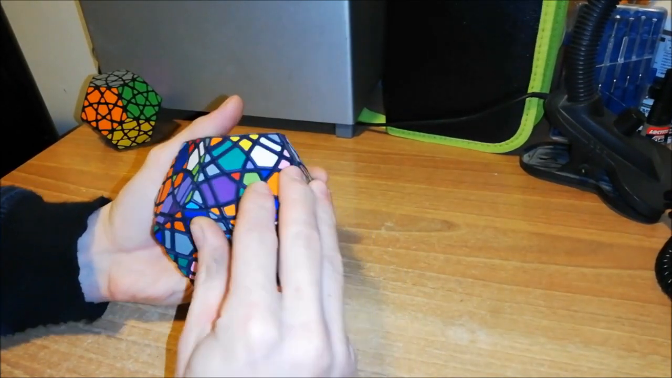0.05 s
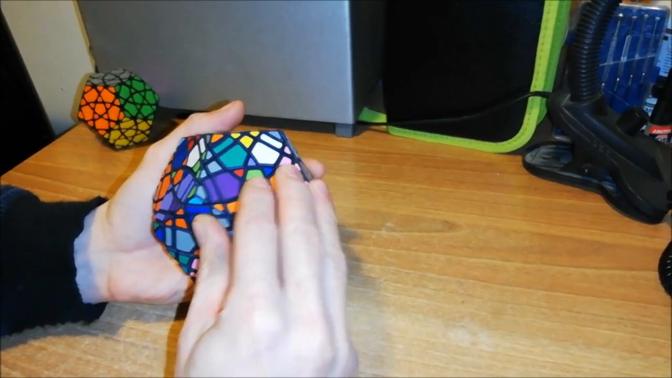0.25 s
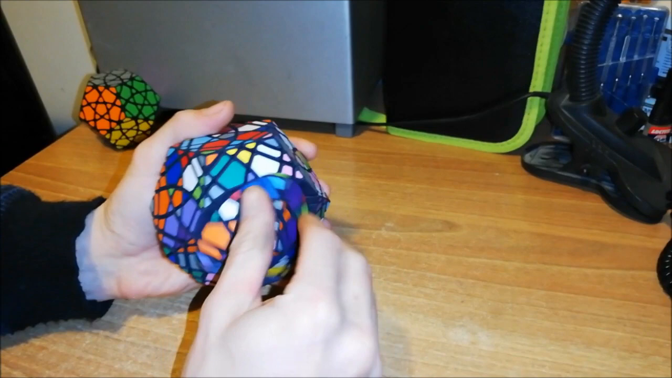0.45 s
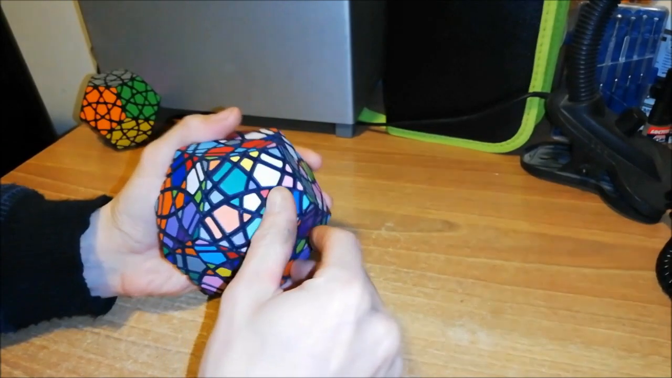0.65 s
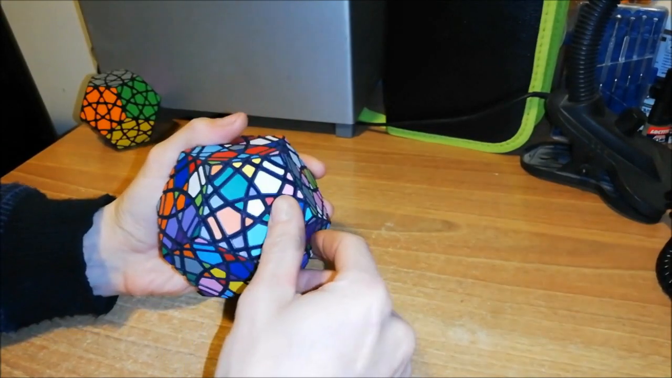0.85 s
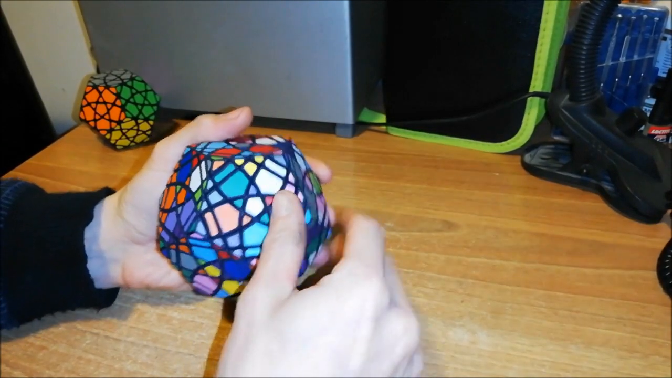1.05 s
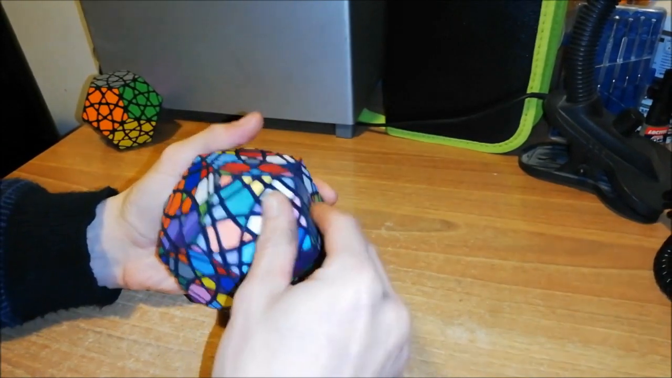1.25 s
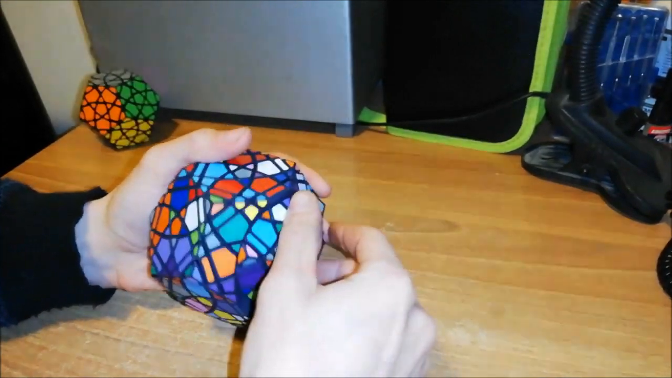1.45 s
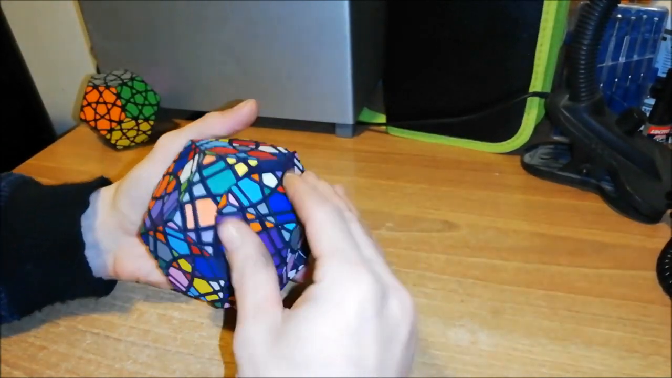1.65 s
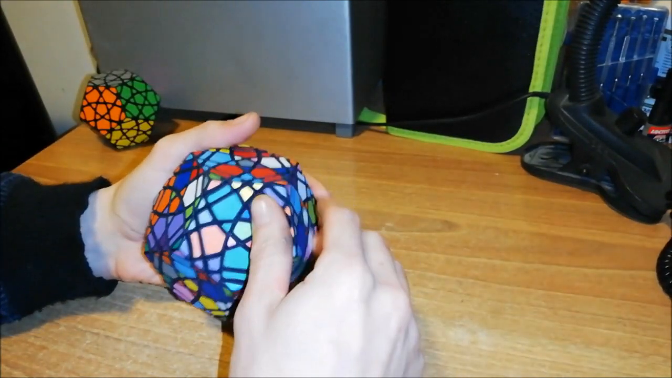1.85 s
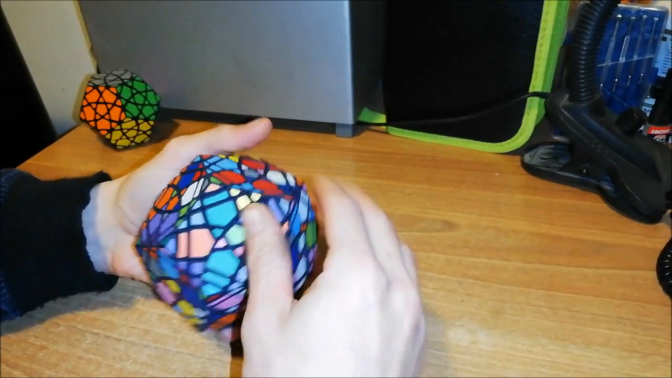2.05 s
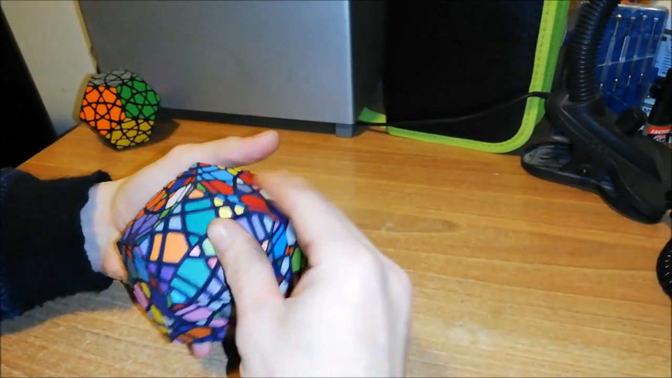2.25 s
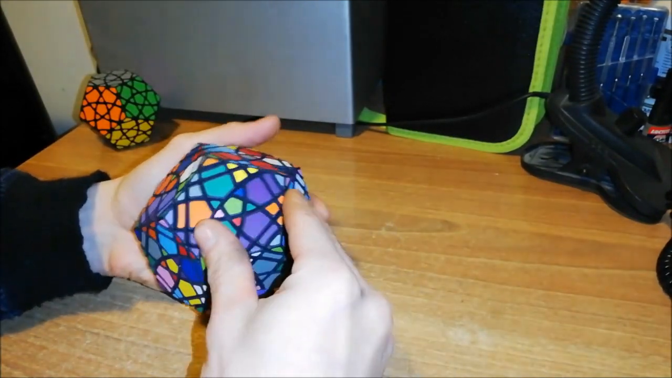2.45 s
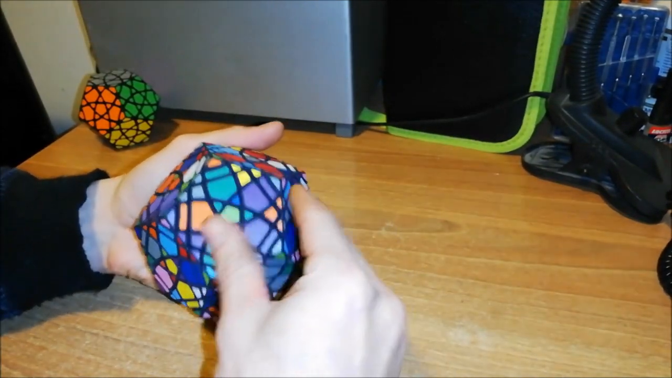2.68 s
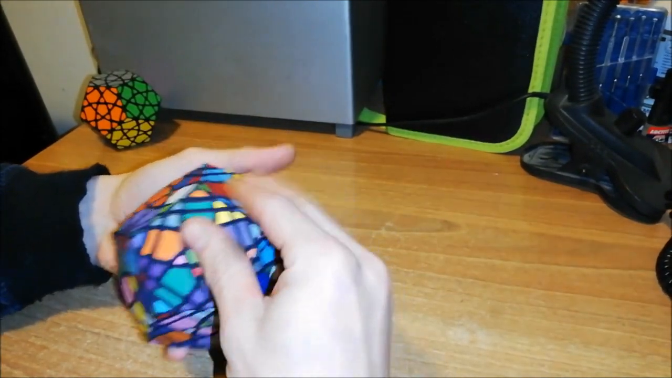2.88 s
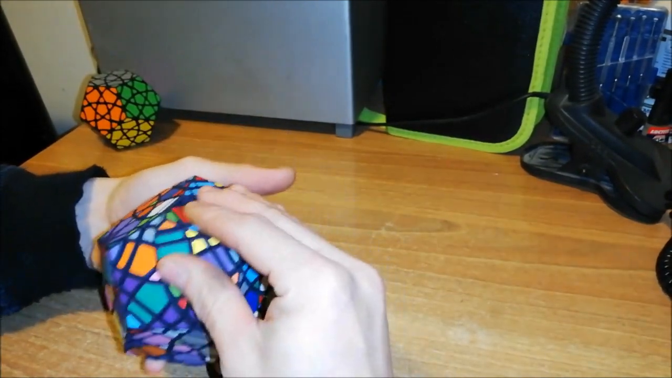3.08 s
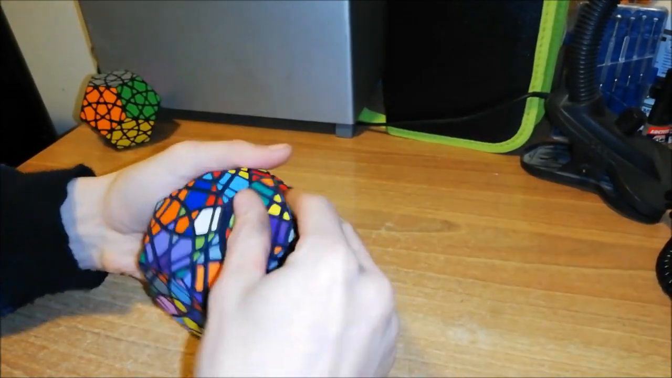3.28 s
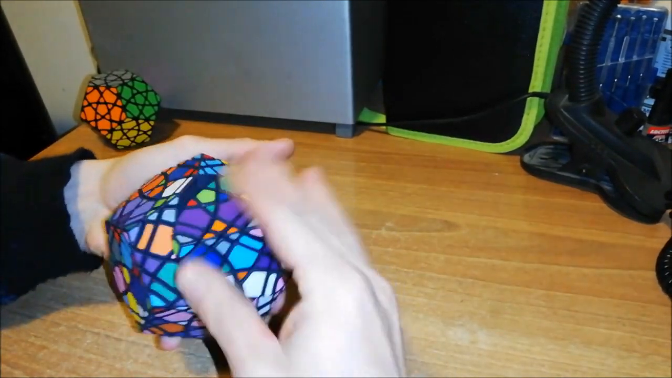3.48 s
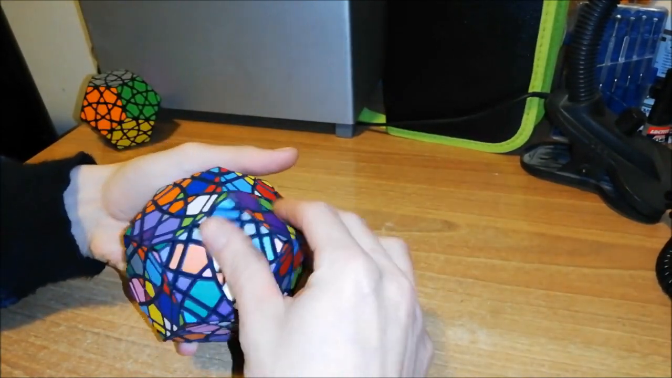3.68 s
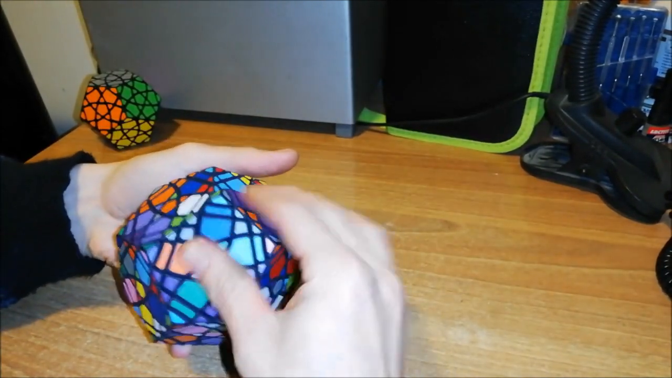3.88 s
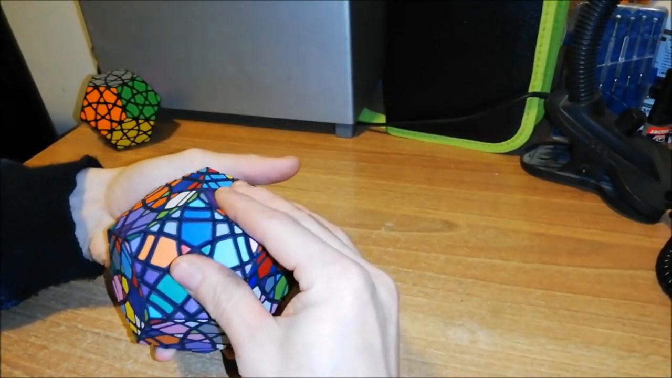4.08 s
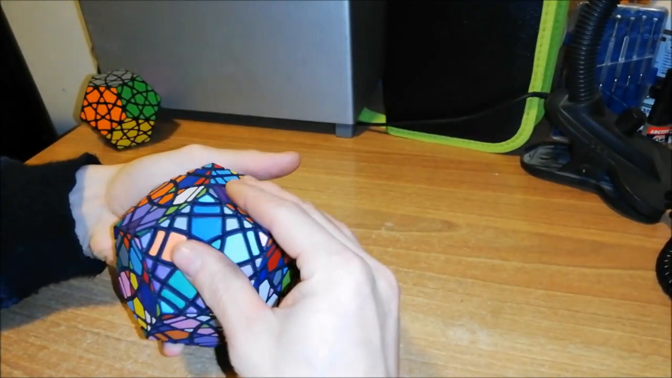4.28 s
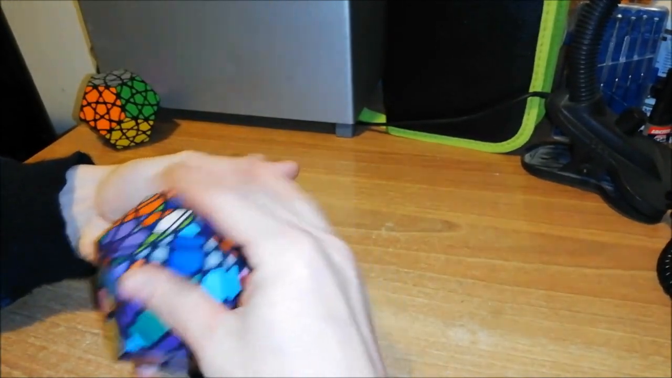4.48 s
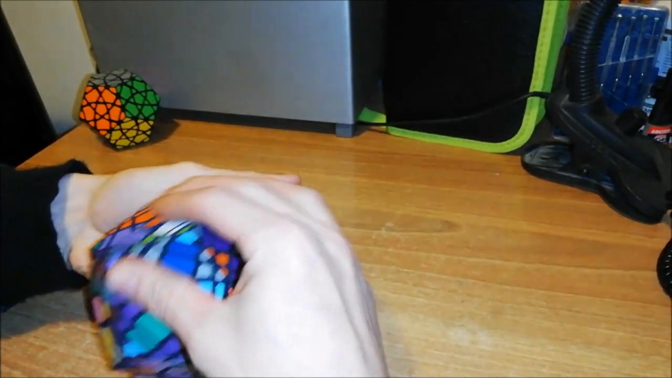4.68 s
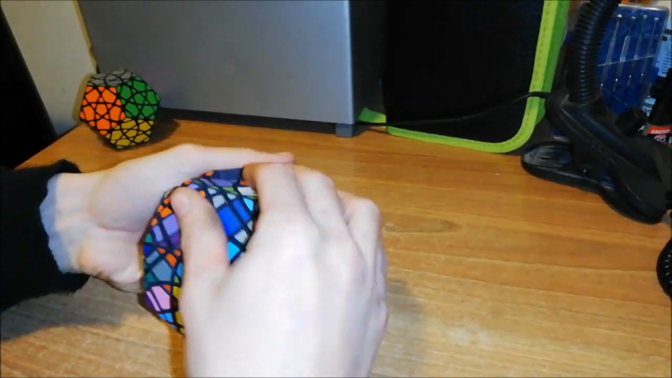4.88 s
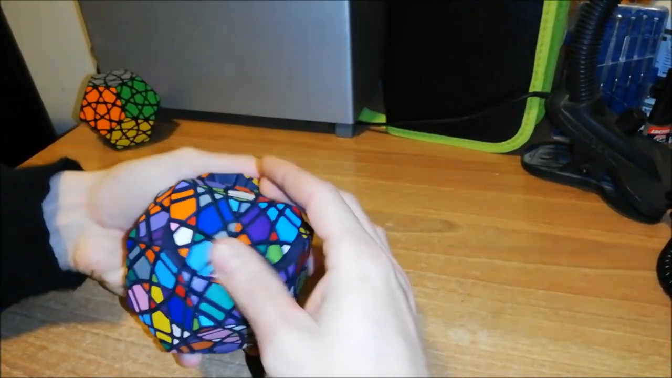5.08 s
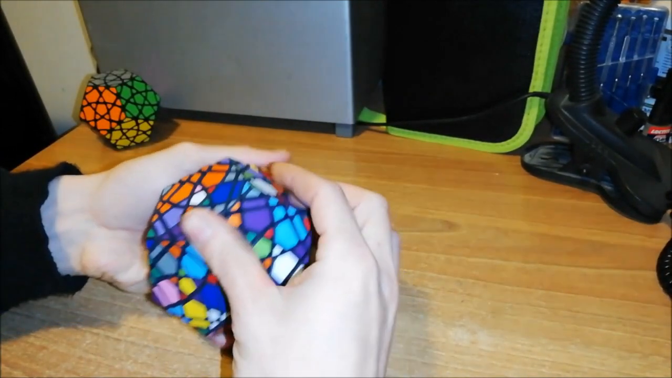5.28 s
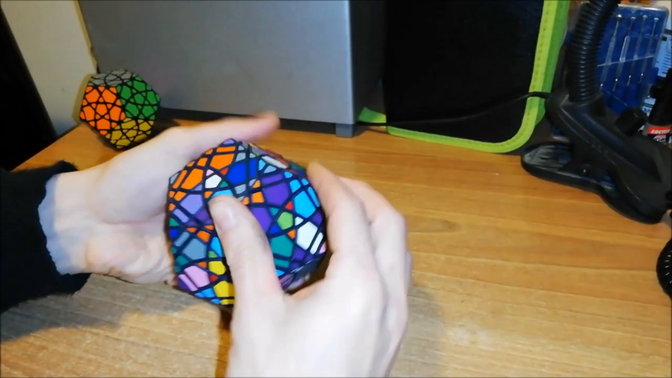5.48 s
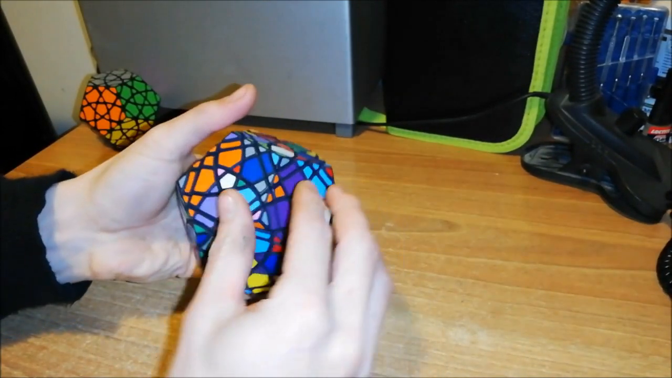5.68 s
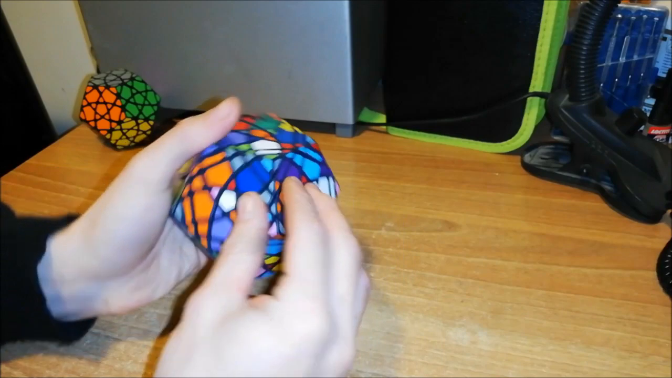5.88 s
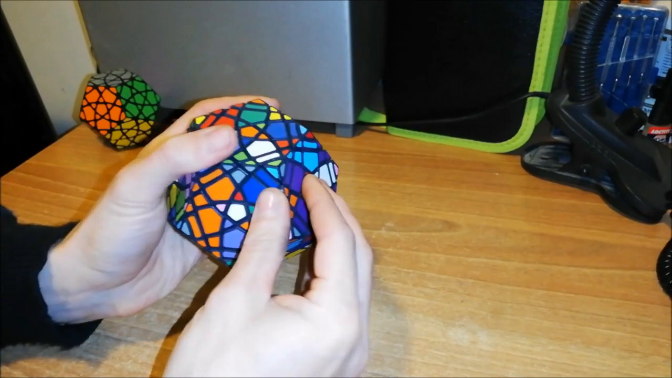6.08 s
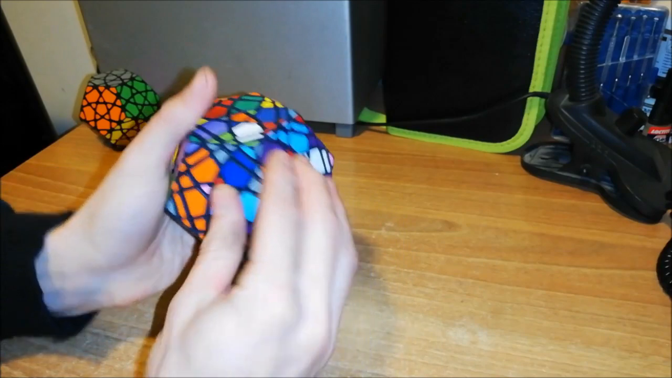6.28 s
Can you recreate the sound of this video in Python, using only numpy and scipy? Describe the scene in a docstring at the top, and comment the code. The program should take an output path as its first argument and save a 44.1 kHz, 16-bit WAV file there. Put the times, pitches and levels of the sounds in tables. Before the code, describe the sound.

A many-sided plastic twisty puzzle is turned by hand in a quiet room, with bright hollow scrapes, sharp clicks and a soft desk thud.

```python
"""Over a desk in a small quiet room, a many-sided plastic twisty puzzle is turned by hand.
Each turn drags pieces over each other: dense random slips, coloured as bright scrape, caps and hollow shell.
Pieces tick and rattle as enveloped noise bursts; fingertips rub as softer slips, and one squeaks as a rising sine.
The desk booms dully as decaying low sines, over a faint rustle of loose pieces and steady coloured noise."""
import sys
import numpy as np
from scipy import signal
from scipy.fft import rfft, irfft
from scipy.io import wavfile

SR = 44100
rng = np.random.default_rng(int(sys.argv[2]) if len(sys.argv) > 2 else 0)


def digitize_waveform(pressure):
    """Quantize a signal to 16-bit integers and store it at the path in sys.argv[1].

    Rows of a 2-D input are taken as channels; values are limited to [-1, 1].
    """
    field = np.atleast_2d(pressure).T
    bounded = np.clip(field, -1, 1)
    quanta = np.round(bounded * 32767).astype(np.int16)
    wavfile.write(sys.argv[1], SR, quanta)


N = 279456
HZ = np.fft.rfftfreq(N, 1 / SR)
TIME = np.arange(N) / SR

# Hollow modes of the puzzle, deepest first. Each row: frequency in Hz, width in Hz, relative level in dB.
SHELL_MODES = [(713, 163, -2.5), (957, 294, -0.5), (1090, 255, -4)]


def gain_of(db):
    """Decibels to an amplitude factor."""
    return 10 ** (np.asarray(db) / 20)


def evened(x):
    """Scales to rms 1."""
    return x / np.sqrt(np.mean(x ** 2) + 1e-20)


def read(points, hz):
    """Interpolates a table on a log-frequency axis."""
    f, value = np.transpose(points)
    return np.interp(np.log(hz + 1), np.log(f + 1), value)


def add(mix, start_s, sound):
    """Adds a sound to the mix at a time, cut at the end of the mix."""
    part = mix[..., round(start_s * SR):][..., :sound.shape[-1]]
    part += sound[..., :part.shape[-1]]


def filtered(x, response):
    """Filters so that white noise keeps its power."""
    return irfft(rfft(x) * response / np.sqrt(np.mean(abs(response) ** 2)), N)


def treble(x, hz):
    """The part of a sound above a frequency, with a soft skirt."""
    return irfft(rfft(x) * HZ ** 4 / (HZ ** 4 + hz ** 4), N)


def colour(points):
    """Minimum-phase response with a given spectrum in dB."""
    log_gain = np.log(gain_of(read(points, HZ)))
    circle = np.concatenate([log_gain, log_gain[-2:0:-1]])
    return np.exp(np.conj(signal.hilbert(circle)))[:len(HZ)]


def ringing(modes):
    """Response of a body: broad modes with steep skirts."""
    power = sum(gain_of(db) ** 2 / (1 + (2 * (HZ - hz) / width_hz) ** 4) for hz, width_hz, db in modes)
    return colour(np.column_stack([HZ, 10 * np.log10(power + 1e-9)]))


def lurch(per_s):
    """Slow random unevenness of rms 1."""
    return evened(filtered(rng.standard_normal(N), 1 / (1 + (HZ / per_s) ** 4)))


def slips(per_s, spread_db, ring_s):
    """Random stick-slip releases of uneven size, each a short decaying noise burst."""
    happens = rng.random(N) < per_s / SR
    size = gain_of(spread_db * np.minimum(rng.exponential(1, N), 4)) * happens
    energy = signal.lfilter([1], [1, -np.exp(-2 / (ring_s * SR))], size ** 2)
    return evened(np.sqrt(energy) * rng.standard_normal((2, N)))


def arch(start_s, length_s, edge_db, fade_s=0.0089):
    """Gain of a touch, edge_db at its ends against its middle, with a short fade beyond each end."""
    off_centre_s = abs(TIME - start_s - length_s / 2)
    inside = np.clip((length_s / 2 - off_centre_s) / fade_s + 1, 0, 1)
    return inside * gain_of(edge_db * np.minimum(2 * off_centre_s / length_s, 1) ** 2)


def paired(x, likeness):
    """Makes two unrelated signals partly alike, band by band."""
    a, b = rfft(x)
    same = np.clip(read(likeness, HZ), -1, 1)
    return irfft(np.array([a, same * a + np.sqrt(1 - same ** 2) * b]), N)


def hiss(level_db=-64.5):
    """Steady room and microphone noise: white noise coloured and partly shared between the channels."""
    # Each row: frequency in Hz, relative density in dB per Hz.
    spectrum = [(12, -34), (20, 1.5), (22, -3), (98, -3.5), (187, -7.5), (221, -7), (284, -8), (317, -8),
                (443, -9), (754, -12.5), (1350, -11.5), (2240, -13.5), (4140, -14), (9300, -15.5),
                (15800, -24)]
    # Each row: frequency in Hz, left-right likeness from -1 to 1.
    likeness = [(60, 0.98), (180, 0.4), (550, -0.55), (1650, 0.14), (4970, -0.076), (15000, 0.073)]
    noise = filtered(rng.standard_normal((2, N)), colour(spectrum))
    return gain_of(level_db) * paired(noise, likeness)


def play(play_db=-81):
    """Loose pieces rustle faintly all the while: sparse slips ring the upper shell modes."""
    rustle = slips(per_s=160, spread_db=2.0, ring_s=0.0025)
    return gain_of(play_db) * filtered(rustle, ringing(SHELL_MODES[1:]))


def fingers(skin_db=1, hollow_db=-13, bright_hz=7000, edge_db=-11.5):
    """Skin whispers over the faces in fine slips, and stirs the shell a little."""
    # Slides. Each row: start in seconds, length in seconds, relative level in dB, treble gain in dB.
    slides = [(-0.03, 0.16, -63.5, -8), (2.328, 0.23, -67, 8), (3.8, 0.44, -61, -1.5),
              (4.143, 0.73, -69.5, -1), (4.696, 0.067, -62.5, -13), (5.045, 0.13, -66, 0),
              (5.898, 0.29, -67.5, 0.5), (6.26, 0.089, -71, 3)]
    # Skin on plastic. Each row: frequency in Hz, relative density in dB per Hz.
    skin_spectrum = [(200, -16), (1000, -7.5), (2000, -7), (4500, -6), (7000, -7), (9500, -0.5),
                     (12000, -12.5), (16000, -16)]
    pressure = sum(gain_of(db) * arch(start_s, length_s, edge_db) for start_s, length_s, db, _ in slides)
    bright = sum((gain_of(db) - 1) * arch(start_s, length_s, 0) for start_s, length_s, _, db in slides)
    rub = pressure * slips(per_s=980, spread_db=0.0, ring_s=0.0022)
    skin = filtered(rub, colour(skin_spectrum))
    skin += bright * treble(skin, bright_hz)
    return gain_of(skin_db) * skin + gain_of(hollow_db) * filtered(rub, ringing(SHELL_MODES))


def squeak(start_s=0.163, length_s=0.04, level_db=-61.5, start_hz=265, rise_hz_per_s=2300):
    """Skin sticks and slips on a face: a short, soft, rising sine."""
    hz = start_hz + rise_hz_per_s * np.clip(TIME - start_s, 0, length_s)
    tone = np.sin(2 * np.pi * np.cumsum(hz) / SR)
    return gain_of(level_db) * arch(start_s, length_s, edge_db=-22) * tone


def turn_shape(start_s, rise_s, fall_s, swell_db):
    """One push of the hand: how far the layer is moving (0-1), and its level against full speed in dB."""
    bite_s, stop_s = 0.045, 0.008  # breaking loose, coming to rest
    swell_power, brake_power = 0.87, 1.85  # push builds almost evenly; braking starts gently, then tightens
    brake_db = 29  # fall over the slowing time
    t = TIME - start_s
    moving = np.clip(t / bite_s, 0, 1) ** 2 * np.clip((rise_s + fall_s - t) / stop_s + 0.5, 0, 1)
    lacking = np.clip(1 - t / rise_s, 0, 1)
    braked = np.clip((t - rise_s) / fall_s, 0, 2)
    return moving, -swell_db * lacking ** swell_power - brake_db * braked ** brake_power


def turns(scrape_db=3.0, hollow_db=0.0, deep_db=-7.5, caps_db=-10.5,
          catch_db=0.46, catch_per_s=80, waver_db=1, waver_per_s=35):
    """Sliding layers: bright slips at the surfaces, with caps and shell ringing under them."""
    # Turns and nudges of a layer. Each row: start in seconds, speeding up in seconds, slowing down in seconds,
    # relative scrape level at full speed in dB, swell from first bite to full speed in dB,
    # hollow ring against scrape in dB, then per grip: deepest shell mode, cap ring and treble gains in dB.
    turn_rows = [(0.335, 0.16, 0.183, -36.6, 19, -6.3, 2.5, -4, 1),
                 (1.386, 0.073, 0.125, -39.5, 0.5, -5, -1.5, 0.5, 0),
                 (1.79, 0.075, 0.13, -36.5, 13.5, -5.5, -1.5, 1, 0.5),
                 (2.552, 0.062, 0.068, -63.5, -8, 5.5, -4, 9, 0.5),
                 (2.98, 0.12, 0.085, -51, 16, -5.5, 4, 6, 0),
                 (3.203, 0.14, 0.09, -36.1, 14, -7, 5, 2.5, -0.5),
                 (3.675, 0.092, 0.095, -37.7, 4, -7.5, 3.5, -5.5, -0.5),
                 (4.055, 0.06, 0.085, -60, -1.5, -1.5, 6, 8, 0.5),
                 (4.731, 0.178, 0.081, -37.7, 23, -5.5, 4.5, 5, 1.5),
                 (5.186, 0.13, 0.06, -43.5, 4, -2.5, 3, 5.5, -1)]
    # Plastic slipping on plastic. Each row: frequency in Hz, relative density in dB per Hz.
    scrape_spectrum = [(100, -31.5), (250, -36.5), (350, -14.5), (450, -15.5), (600, -4.5), (1400, -2.5),
                       (2000, -1.5), (2700, 0.5), (3500, -1.5), (5200, -1.2), (6300, -3), (8000, -1.2),
                       (9800, -0.5), (12000, -8.5), (16000, -19.5)]
    # Modes of the plastic caps. Each row: frequency in Hz, width in Hz, relative level in dB.
    cap_modes = [(1410, 410, -0.5), (2090, 820, -0.5)]
    ring_follows = 0.8  # dB of shell ring per dB of scrape: slow sliding sounds hollower

    scrape, hollow = np.zeros((2, N))
    drag = gain_of(catch_db * lurch(catch_per_s))  # edges catch and let go as they cross the seams
    for start_s, rise_s, fall_s, level_db, swell_db, ring_db, *_ in turn_rows:
        moving, speed_db = turn_shape(start_s, rise_s, fall_s, swell_db)
        scrape += drag * moving * gain_of(level_db + speed_db)
        hollow += drag * moving * gain_of(level_db + ring_db + ring_follows * speed_db)
    hollow *= gain_of(waver_db * lurch(waver_per_s))  # moving pieces pass the slips to the shell unevenly

    starts_s, *_, deep, caps, bright = np.transpose(turn_rows)
    grip = np.maximum(np.searchsorted(starts_s, TIME) - 1, 0)  # each grip holds until the next turn
    deep, caps, bright = (gain_of(column)[grip] for column in (deep, caps, bright))

    surface_slips = slips(per_s=4500, spread_db=-1.0, ring_s=0.0014)
    surface = filtered(scrape * surface_slips, colour(scrape_spectrum))
    surface += (bright - 1) * treble(surface, hz=6100)
    cap_slips = slips(per_s=1100, spread_db=2.0, ring_s=0.00084)
    cap_ring = filtered(caps * scrape * cap_slips, ringing(cap_modes))
    # the heavy shell smooths the slips into a hollow rush
    push = hollow * slips(per_s=5100, spread_db=1.5, ring_s=0.0022)
    deep_push = deep * hollow * slips(per_s=3300, spread_db=-0.5, ring_s=0.0055)
    body = gain_of(hollow_db) * filtered(push, ringing(SHELL_MODES[1:]))
    body += gain_of(deep_db) * filtered(deep_push, ringing(SHELL_MODES[:1]))
    return gain_of(scrape_db) * surface + gain_of(caps_db) * cap_ring + body


def strays(count=32, level_db=-73.5, spread_db=1.5, ring_db=10.5, rattle_s=0.0077):
    """Faint ticks of pieces settling at random moments, as rows like those of the clicks."""
    return [(when * TIME[-1], level_db + spread_db * (2 * size - 1), ring_db, rattle_s, 0)
            for when, size in rng.random((count, 2))]


def clicks(click_db=1.5, hollow_db=-4, rise_share=0.12, ping_hz=9100, ping_width_hz=4200):
    """Pieces snap and rattle: decaying noise bursts, the longer ones starting more softly, that knock the shell."""
    # Pieces catching and seating. Each row: start in seconds, relative level in dB, hollow ring in dB,
    # rattle decay constant in seconds, gain of the high ping band in dB.
    click_rows = [(0.359, -57.5, 10.5, 0.016, 0), (0.383, -42.5, 0, 0.009, 0), (0.661, -50, 1, 0.023, -0.5),
                  (0.877, -59, 9.5, 0.005, -2), (0.932, -49.5, 1.5, 0.016, 1),
                  (0.948, -48.5, -12, 0.0073, -8), (1.359, -56, 3, 0.024, 1),
                  (1.376, -54.5, 6.5, 0.013, -2), (1.4205, -35, 3.5, 0.011, 2),
                  (1.596, -60.5, -8, 0.0086, 7.5), (1.793, -57.5, 8, 0.0036, 9),
                  (1.8346, -40, 0, 0.0042, 5), (2.068, -59.5, -2, 0.01, -4), (2.471, -49.5, 4, 0.012, 4.5),
                  (2.579, -59, 8, .007, 0), (2.6, -58, 12, .006, -4), (2.624, -59, 12.5, 0.0057, 2),
                  (2.654, -53, -9, .005, 3), (2.9845, -44, 0, 0.0065, -5), (3.2407, -48, -7, 0.007, 2),
                  (3.343, -36, -14, 0.018, 0), (3.44, -56, 1, .016, 4.5), (3.508, -57.5, 2, 0.015, 0),
                  (3.6592, -53.5, 0, 0.022, -4), (3.7017, -45, 6, .007, 4), (4.0268, -41.5, -4, 0.0017, 4),
                  (4.773, -44.5, 0, 0.0076, 3), (4.862, -46, 6, 0.025, -2), (5.226, -49, -1, 0.013, 4),
                  (5.925, -51.5, 2, 0.0018, 10), (6.0577, -61, 4, 0.015, 2)]
    # An edge snapping past another. Each row: frequency in Hz, relative density in dB per Hz.
    tick_spectrum = [(150, -42), (600, -19), (1500, -1), (3500, -1.5), (5000, -1.5), (7000, -6), (9400, 3),
                     (12000, -7.5), (16000, -20)]
    tick, ping, knock = np.zeros((3, 2, N))
    t = TIME[:SR // 10]
    for start_s, level_db, ring_db, rattle_s, ping_db in click_rows + strays():
        envelope = np.exp(-t / rattle_s) * (1 - np.exp(-t / (rise_share * rattle_s)))
        burst = gain_of(level_db) * envelope * rng.standard_normal((2, len(t)))
        add(tick, start_s, burst)
        add(ping, start_s, (gain_of(ping_db) - 1) * burst)
        add(knock, start_s, gain_of(ring_db) * burst)
    # a small piece struck on its edge rings in the ping band
    tick += irfft(rfft(ping) / (1 + (2 * (HZ - ping_hz) / ping_width_hz) ** 4), N)
    tick = filtered(tick, colour(tick_spectrum))
    return gain_of(click_db) * tick + gain_of(hollow_db) * filtered(knock, ringing(SHELL_MODES))


def desk(push_s=0.0086):
    """The shifting arm's soft, rubbing pushes swell into the low modes of the desk top."""
    # Pushes. Each row: start in seconds, level in dB.
    bumps = [(2.824, -48), (2.851, -50.5), (2.896, -51), (2.962, -62)]
    # Desk modes. Each row: frequency in Hz, gain in dB, decay time in seconds, phase roughness in radians rms.
    desk_modes = [(142.4, 3.5, 0.18, 0.34), (127, -9.5, 0.4, 0.97), (271, -8, 0.13, 0.7),
                  (344, -12.5, 0.15, 0.6), (680, -16, 0.097, 1)]
    out, t = np.zeros(N), TIME[:SR // 2]
    for hz, mode_db, decay_s, rough_rad in desk_modes:
        swell = np.zeros(N)
        envelope = 0.0014 ** (t / decay_s) * (1 - np.exp(-t / push_s)) ** 2  # falls 57 dB in decay_s
        for start_s, level_db in bumps:
            add(swell, start_s, gain_of(level_db + mode_db) * envelope)
        out += swell * np.sin(2 * np.pi * hz * TIME + rough_rad * lurch(per_s=36))
    return out


def ports(x, lag_ms=0.15):
    """The puzzle is held left of centre, so its sound reaches the left microphone port first."""
    # Each row: frequency in Hz, left-right likeness (clipped to -1..1 after interpolation).
    likeness = [(200, 1), (700, -0.58), (1000, 1.56), (1600, -0.34), (2300, 1.36), (3200, 0.0244),
                (15000, 0.01)]
    # Each row: frequency in Hz, left minus right in dB.
    balance = [(450, 1.5), (700, 4), (900, -2), (1450, -7), (2100, -1), (2900, 0), (4200, 1.5), (6300, 0.5),
               (8300, 4), (11000, -0.5)]
    left, right = rfft(paired(x, likeness))
    lean = gain_of(read(balance, HZ))
    late = np.exp(-2j * np.pi * HZ * lag_ms / 1000)
    return irfft(np.array([left * lean, right * late]) * np.sqrt(2 / (1 + lean ** 2)), N)


def room(x, far_decay_s=0.32, far_db=-15, near_decay_s=0.067, near_db=-9):
    """Small things on the desk scatter the treble back quickly; a faint tail follows from the walls."""
    t = TIME[:SR // 2]
    near, far = rng.standard_normal((2, 2, len(t))) * (t > 0.001)
    # falls of 56 and 61 dB in the decay times, each response scaled to unit energy
    near = evened(near * 0.0016 ** (t / near_decay_s)) / np.sqrt(len(t))
    far = evened(far * 0.00091 ** (t / far_decay_s)) / np.sqrt(len(t))
    scatter = signal.fftconvolve(treble(x, hz=2460), near, axes=1)[:, :N]
    tail = signal.fftconvolve(x, far, axes=1)[:, :N]
    return x + gain_of(near_db) * scatter + gain_of(far_db) * tail


def scene():
    """The puzzle in its room, with the squeak, the desk and the noise floor added dry."""
    puzzle = play() + fingers() + turns() + clicks()
    return hiss() + squeak() + desk() + room(ports(puzzle))


def record(dry):
    """The recorder's band limit: a steep linear-phase low-pass."""
    edge_hz = 15900
    lowpass = signal.firwin(511, edge_hz, window=("kaiser", 9), fs=SR)
    return signal.oaconvolve(dry, lowpass[None], "same")


dry = scene()
out = record(dry)
digitize_waveform(out)
```